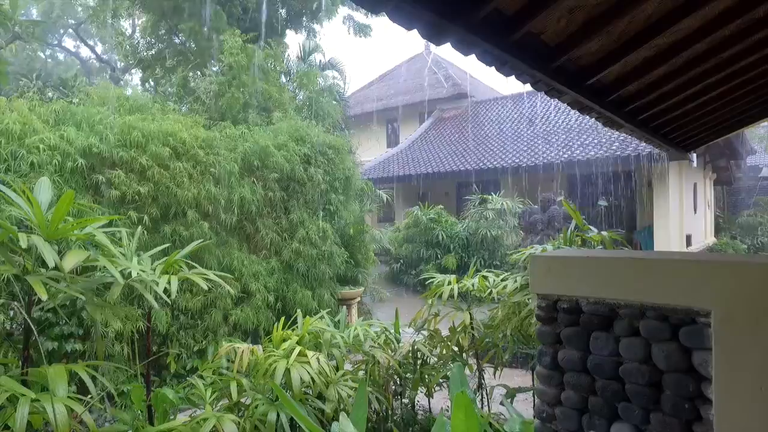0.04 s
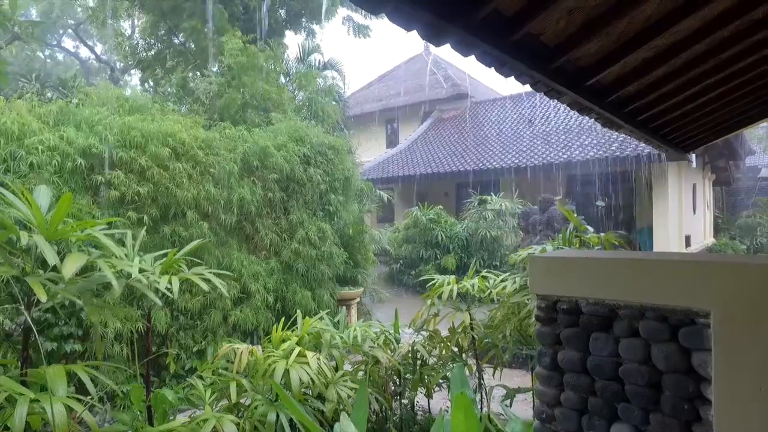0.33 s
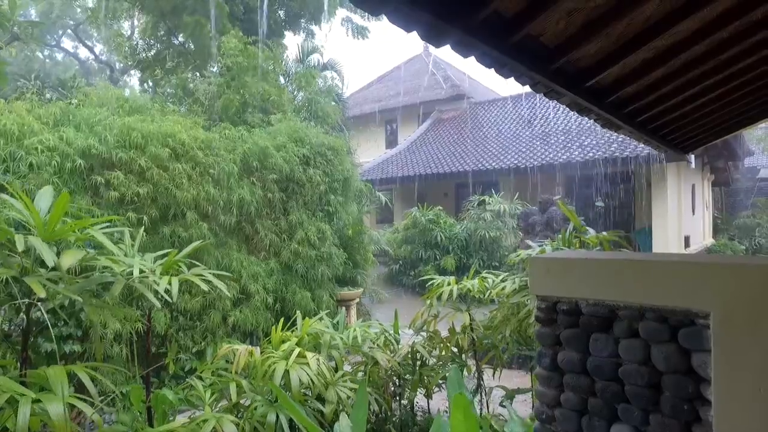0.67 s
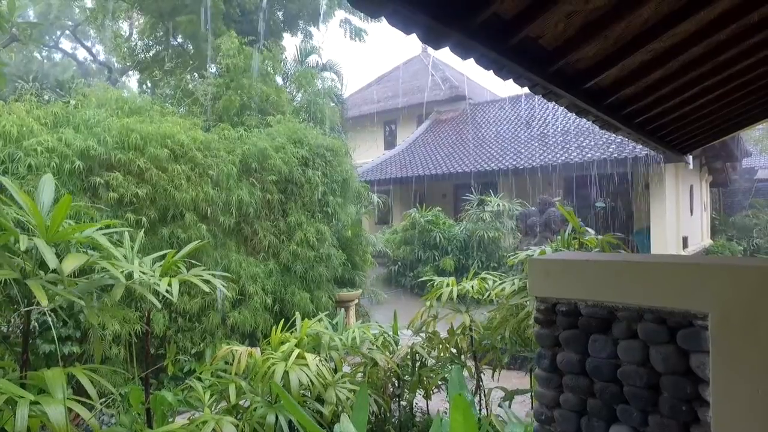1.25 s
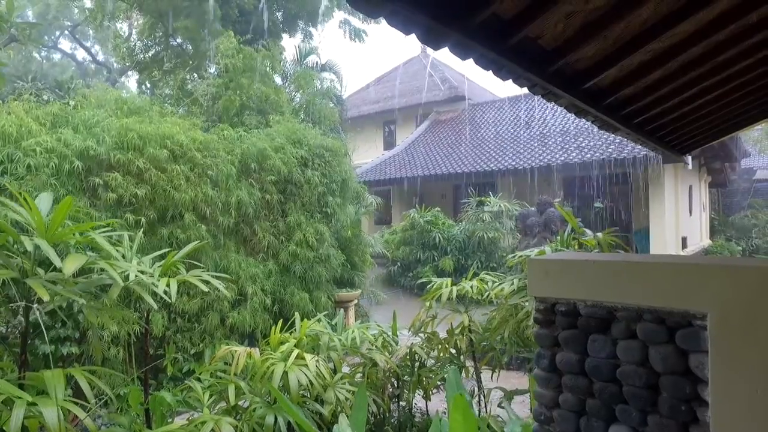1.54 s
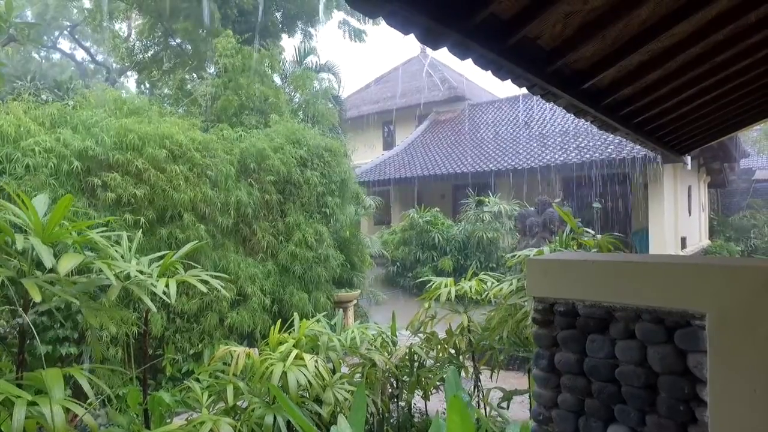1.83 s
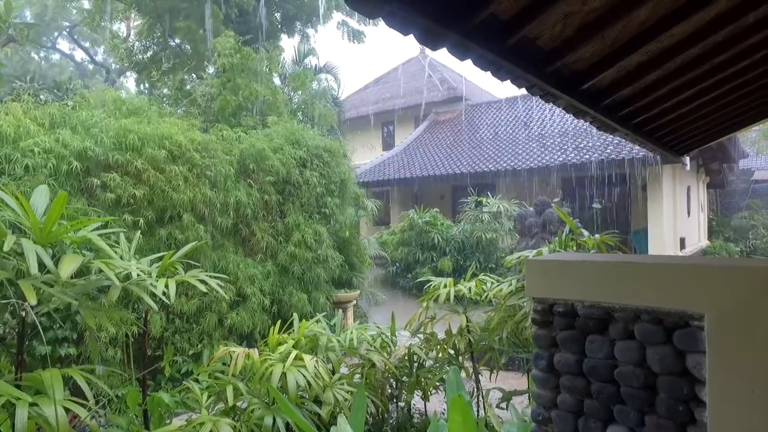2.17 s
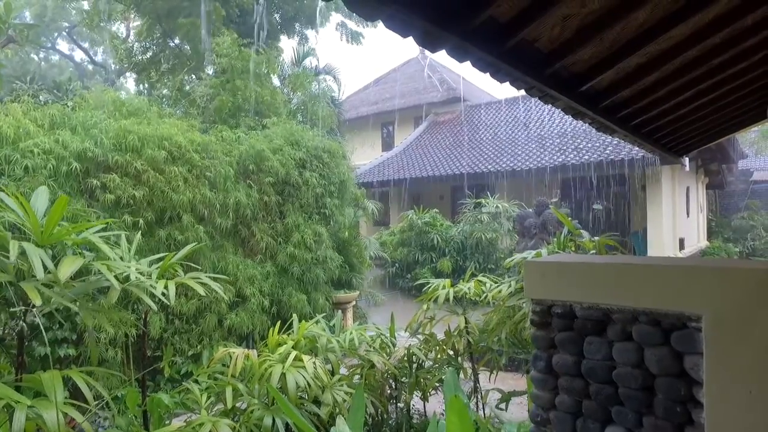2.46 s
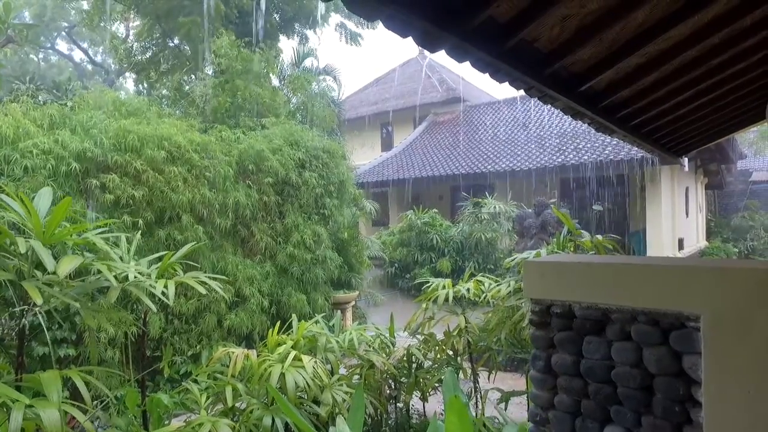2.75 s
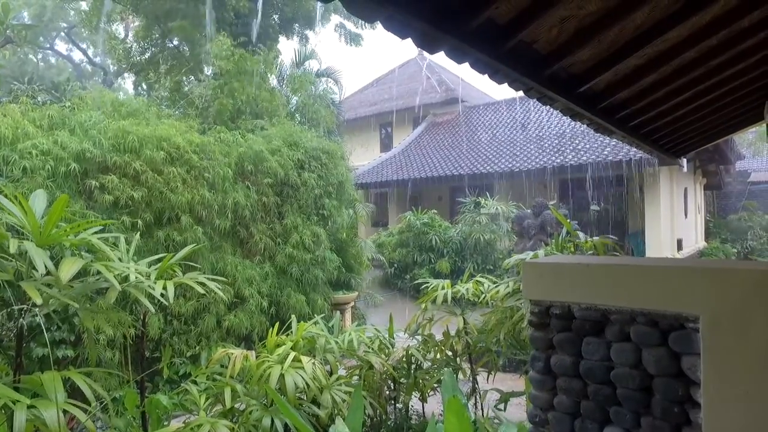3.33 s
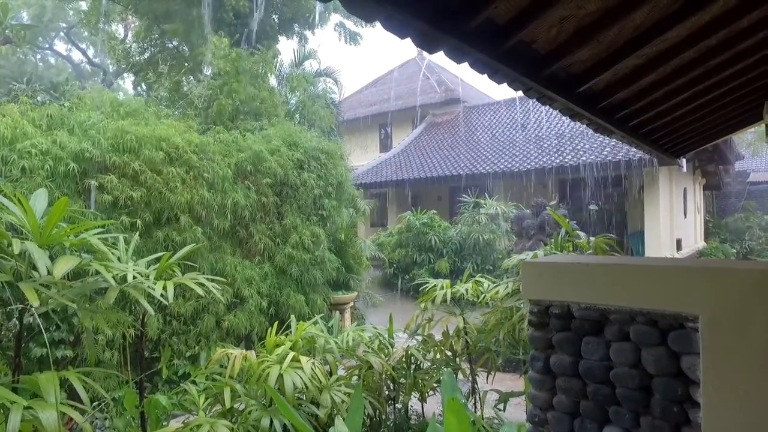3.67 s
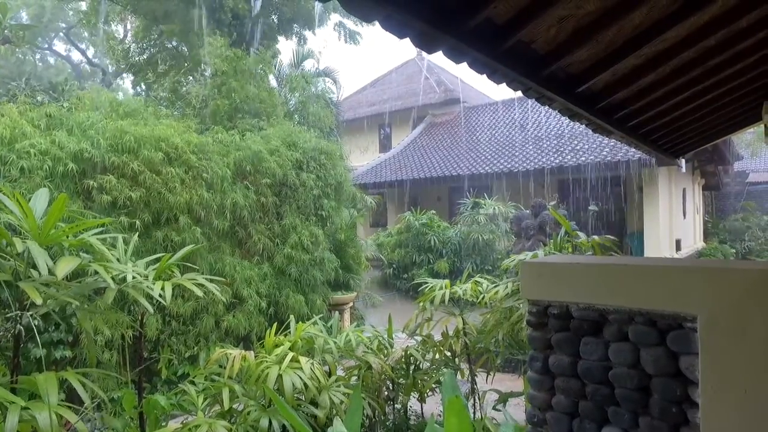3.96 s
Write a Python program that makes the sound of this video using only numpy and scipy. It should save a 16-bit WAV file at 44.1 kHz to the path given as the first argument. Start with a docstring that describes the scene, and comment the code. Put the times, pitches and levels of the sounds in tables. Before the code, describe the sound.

Heavy rain falls steadily on a tropical garden, heard from under a roof. Fat drops tick and splash on nearby leaves and paving, run-off occasionally plops into puddles, and a faint low hum lies underneath.

```python
"""Heavy, steady rain on a tropical garden, heard in mono from under a roof.
After a moment of silence it all cuts in: countless far drops merge into a wash, nearer ones patter,
tiny bubbles ring, and a low, wavering hum, like a distant motor, lies underneath.
From about 0.3 s to the end, fat drops tick and splash on leaves and paving close by.
Five times between 0.5 s and 3.8 s, run-off plops into puddles, each plop a bubble rising in pitch."""
import sys
import numpy as np
from scipy import signal
from scipy.fft import rfft, irfft
from scipy.io import wavfile

SR = 44100
rng = np.random.default_rng(int(sys.argv[2]) if len(sys.argv) > 2 else 0)


def file_out(sig):
    """Save sig as 16-bit WAV at sys.argv[1]."""
    # one column per channel
    cols = np.atleast_2d(sig).T
    # limit, then scale
    lim = np.clip(cols, -1, 1)
    pcm = np.round(lim * 32767).astype(np.int16)
    wavfile.write(sys.argv[1], SR, pcm)


N = 176400


def from_db(db):
    """Turn decibels into a gain to multiply by."""
    return 10 ** (np.asarray(db) / 20)


def rms_one(x):
    """Scale a signal to an average power of 1."""
    return x / np.sqrt(np.mean(x ** 2) + 1e-20)


def in_time(rows):
    """Join (time_s, value) points with straight lines, one value a sample."""
    return np.interp(np.arange(N) / SR, *np.transpose(rows))


def at_hz(points, hz):
    """Read a curve of (pitch_hz, level_db) points at the given pitches."""
    pitch_hz, level_db = np.transpose(points)
    return np.interp(np.log(hz), np.log(pitch_hz), level_db)


def bins_hz():
    """The frequency of each slot in the spectrum, at least 1 Hz."""
    return np.maximum(np.arange(N // 2 + 1) * SR / N, 1)


def drift(rate_hz):
    """A random wander of about 1 up or down, mostly slower than rate_hz."""
    return rms_one(irfft(rfft(rng.standard_normal(N)) / (1 + (bins_hz() / rate_hz) ** 2), N))


def colour(x, db):
    """Give each frequency its own gain; any ringing follows a hit and never comes before it."""
    cepstrum = irfft(np.log(from_db(db)), N)
    fold = 1 + np.sign(N / 2 - np.arange(N))
    fold[0] = 1
    return irfft(rfft(x) * np.exp(rfft(cepstrum * fold)), N)


def band(x, hz, octaves, order):
    """Keep only the pitches around hz."""
    edges = [hz * 2 ** (-octaves / 2), min(hz * 2 ** (octaves / 2), SR / 2 - 1000)]
    return signal.sosfilt(signal.butter(order, edges, "band", fs=SR, output="sos"), x)


def add(out, start_s, sound):
    """Mix a sound in at the given time."""
    i = int(np.clip(start_s * SR, 0, N - 1))
    out[i:i + len(sound)] += sound[:N - i]


def rain_db(hz):
    """How strong the rain is at each pitch, falling away in the deep bass."""
    # Tone of the whole downpour: pitch_hz, relative_db
    rain_tone = [(59, -30), (100, 0), (159, -1), (281, -1.5), (402, -2.5), (496, -1), (876, -0.5),
                 (1060, 0.5), (2040, -2), (4260, -2), (5040, -3), (8720, -12), (11700, -11.5), (14500, -17),
                 (15400, -18.5)]
    return at_hz(rain_tone, hz) - 10 * np.log10(1 + (90 / hz) ** 6)


def hum(pitch_hz=68.9, waver_hz=0.26, boost_db=1.5, rumble_db=-44.5):
    """A low, wavering tone, like a distant motor, swells and dips over a soft rumble."""
    # Swells of the hum: time_s, relative_db
    swells = [(0.12, -45), (0.22, -46), (0.39, -56), (0.44, -47), (0.65, -40.5), (0.72, -50.5), (0.97, -39),
              (1.22, -48.5), (1.49, -42.5), (1.61, -48), (1.78, -43), (2.8, -45), (2.84, -52), (3.05, -52),
              (3.53, -45.5), (3.96, -40), (4.0, -44)]
    # Tone of the rumble: pitch_hz, relative_db
    rumble_tone = [(18, -9), (28, -1), (38, 1), (52, -12), (72, -9), (92, -1), (115, -25), (170, -28)]
    tone = np.sin(2 * np.pi * np.cumsum(pitch_hz + waver_hz * drift(3.7)) / SR)
    hz = bins_hz()
    edge_loss_db = 10 * np.log10(1 + (hz / 200) ** 4 + (15 / hz) ** 4)
    rumble = colour(rng.standard_normal(N), at_hz(rumble_tone, hz) - edge_loss_db)
    return from_db(in_time(swells) + boost_db) * rms_one(tone) + from_db(rumble_db) * rms_one(rumble)


def wash(flicker_db=0.91):
    """Far drops merge into a hiss that flickers slightly."""
    # How the far drops tilt the rain's tone: pitch_hz, gain_db
    tilt = [(150, -4.5), (500, -2.5), (1500, 0), (4000, 0), (8000, 0), (14000, -1)]
    hz = bins_hz()
    hiss = colour(rng.standard_normal(N), rain_db(hz) + at_hz(tilt, hz))
    return from_db(flicker_db * drift(13.3)) * rms_one(hiss)


def patter(surfaces=12, drops_per_s=2600, spread_db=4, spray_gain=0.43, spray_s=0.0067, relative_db=-5):
    """Drops of all sizes hit surfaces that each favour one range of pitch: a tick, then a short spray."""
    # How the nearer drops tilt the rain's tone: pitch_hz, gain_db
    tilt = [(150, -1), (500, 1.3), (1500, -1.5), (4000, -0.3), (8000, 0.4), (14000, -2.5)]
    hz, out = bins_hz(), 0
    centres_hz, width_octaves = np.geomspace(250, 12000, surfaces), 1.09
    shares = np.array([1 / (1 + (np.log2(hz / c) / width_octaves) ** 2) ** 3 for c in centres_hz])
    tone_db = rain_db(hz) + at_hz(tilt, hz)
    fade = np.exp(-2 / (spray_s * SR))
    for share in shares / shares.sum(axis=0):
        sizes = from_db(spread_db * np.minimum(rng.exponential(1, N), 4.04))  # many small, few big
        hits = rng.random(N) < drops_per_s / surfaces / SR
        ticks = sizes * hits * rng.choice([-1, 1], N)
        spray_power = signal.lfilter([1 - fade], [1, -fade], ticks ** 2 + 1e-18)
        spray = np.sqrt(spray_power) * rng.standard_normal(N)
        out = out + colour(rms_one(ticks + spray_gain * spray), tone_db + 10 * np.log10(share))
    return from_db(relative_db) * rms_one(out)


def small_bubbles(per_s=80, low_hz=1500, high_hz=6540, fade_cycles=10.3, rise=0.062):
    """Tiny bubbles ring for a few cycles on the wet ground, rising in pitch."""
    out, t = np.zeros(N), np.arange(1500) / SR
    for elapsed, pitch_draw, level_draw in rng.random((1500, 3)).cumsum(axis=0):
        start_s = 2 * elapsed / per_s  # the random steps average one half
        if start_s < N / SR:
            hz = low_hz * (high_hz / low_hz) ** (pitch_draw % 1)
            age = hz * t / fade_cycles
            level_db = -34 - np.log(max(level_draw % 1, .03))
            ring = np.sin(2 * np.pi * hz * t * (1 + rise * age / 2))
            add(out, start_s, from_db(level_db) * np.exp(-age) * ring)
    return out


def plops(bend=1.68, fade_share=0.14, gurgle_hz=110):
    """A large bubble wobbles and glides upward as it nears the surface of a puddle."""
    # Large bubbles in the puddles: start_s, length_s, first_hz, last_hz, level_db
    bubbles = [(0.558, 0.039, 475, 620, -29.5), (1.367, 0.044, 371, 747, -30),
               (1.836, 0.032, 427, 740, -31.5), (3.1353, 0.0092, 1154, 2000, -21.5),
               (3.736, 0.038, 430, 1050, -30.5)]
    out = np.zeros(N)
    throb = from_db(0.5 * drift(gurgle_hz))
    wobble = 1 + 0.045 * drift(gurgle_hz)
    for start_s, length_s, first_hz, last_hz, level_db in bubbles:
        age = np.linspace(0, 1, int(length_s * SR))
        now = int(start_s * SR) + np.arange(len(age))
        hz = (first_hz + (last_hz - first_hz) * age ** bend) * wobble[now]  # climbs ever faster
        swell = np.minimum(np.minimum(age, 1 - age) / fade_share, 1) * throb[now]
        add(out, start_s, from_db(level_db) * swell * np.sin(2 * np.pi * np.cumsum(hz) / SR))
    return out


def near_drops(samples=3000):
    """A fat drop lands with a sharp tick and a splash that dies quickly."""
    # Fat drops close by: start_s, tick_db, splash_db, pitch_hz, fade_s
    drops = [(.278, -22, -28, 5500, .004), (0.462, -22, -25, 4700, .004), (.512, -20, -23, 3000, .005),
             (.559, -27, -26, 4470, .007), (0.625, -16, -27, 5100, .003), (0.691, -18, -28, 4000, .008),
             (0.696, -10, -21.5, 3800, 0.012), (0.7315, -12, -23, 3980, .0045),
             (.785, -17, -30, 5500, .005), (.830, -9.5, -34, 4400, .004), (0.845, -16, -28, 4960, .004),
             (0.998, -10, -19.5, 3600, 0.003), (1.044, -16, -28, 5200, .004),
             (1.197, -24, -26, 6300, 0.008), (1.5724, -10, -23, 3800, 0.006),
             (1.584, -9.5, -20, 2700, 0.004), (1.586, -24, -29, 3800, 0.035), (1.854, -11, -26, 4800, .004),
             (2.288, -11, -28, 3960, .004), (2.310, -15, -34, 5000, .004), (2.395, -21, -25, 3370, 0.0082),
             (2.635, -28, -24.5, 1500, 0.007), (2.867, -15, -23, 5000, .004),
             (2.956, -27, -20, 1150, 0.0044), (2.9746, -22, -19.5, 3240, 0.003),
             (3.055, -17, -20, 3500, 0.0021), (3.0547, -20, -25.5, 1500, 0.016),
             (3.077, -29, -23, 7850, 0.0049), (3.096, -14, -31, 5000, .004),
             (3.1703, -8, -23.5, 6600, 0.0032), (3.487, -15, -20, 3600, 0.0028),
             (3.708, -26, -30, 6000, .004), (3.741, -16, -25, 5460, 0.0081), (3.825, -18, -24, 1600, .006),
             (3.853, -10, -25, 4200, .006), (3.8758, -11, -23, 4800, .005)]
    out, t = np.zeros(N), np.arange(samples) / SR
    for start_s, tick_db, splash_db, pitch_hz, fade_s in drops:
        tick = band(1.0 * (t == 0), pitch_hz, octaves=1.33, order=3)
        hiss = band(rng.standard_normal(samples), pitch_hz, octaves=0.66, order=2)
        splash = rms_one(hiss) * np.exp(-t / fade_s)
        add(out, start_s, from_db(tick_db) * tick / np.abs(tick).max() + from_db(splash_db) * splash)
    return out


def scene():
    """Rain, bubbles, drops and hum reach both channels alike."""
    # Strength of the wash and patter: time_s, gain_db
    strength = [(0.15, -27.5), (0.3, -29.5), (0.5, -28), (0.85, -28), (1.05, -28.5), (1.4, -28),
                (1.65, -28.5), (1.9, -28), (2.15, -29), (2.55, -27.5), (2.75, -29), (3.05, -28),
                (3.35, -29), (3.85, -27), (3.97, -29)]
    rain = from_db(in_time(strength)) * (wash() + patter())
    return np.tile(rain + small_bubbles() + near_drops() + plops() + hum(), (2, 1))


def record(dry, start_s=0.116, cutoff_hz=15450):
    """The sound cuts in after a moment of silence; the highest treble is cut steeply."""
    live = np.arange(N) / SR >= start_s
    treble_cut = signal.ellip(12, .1, 80, cutoff_hz, fs=SR, output="sos")
    return signal.sosfilt(treble_cut, dry * live)


dry = scene()
out = record(dry)
file_out(out)
```